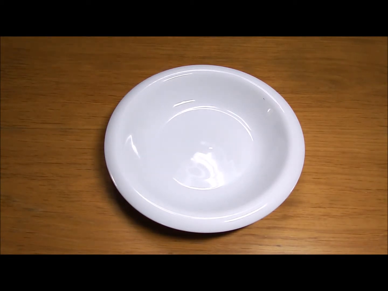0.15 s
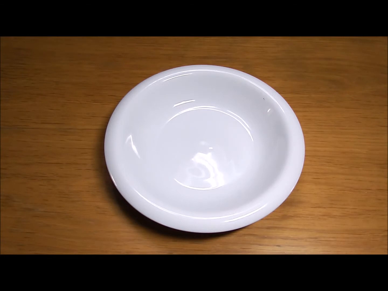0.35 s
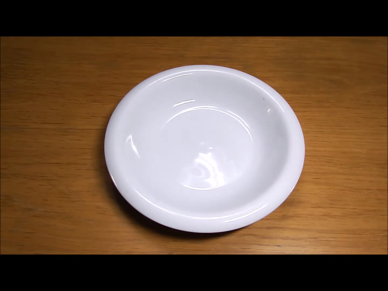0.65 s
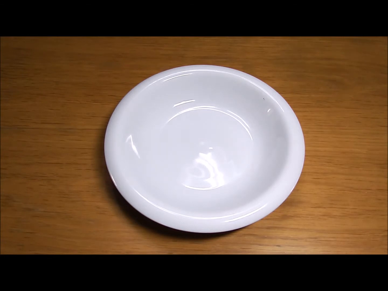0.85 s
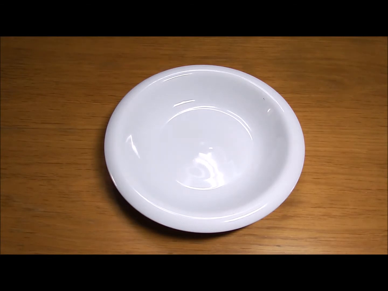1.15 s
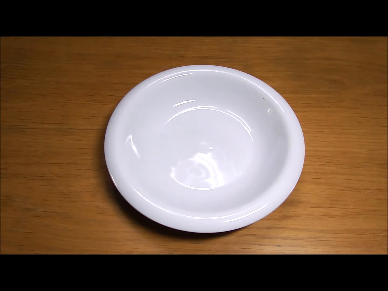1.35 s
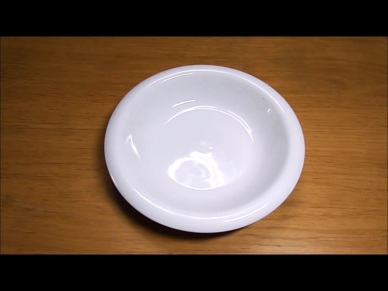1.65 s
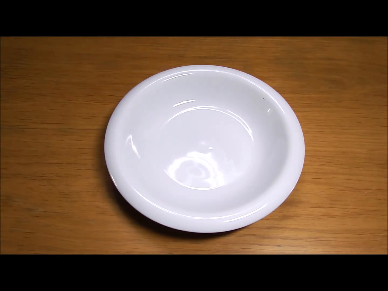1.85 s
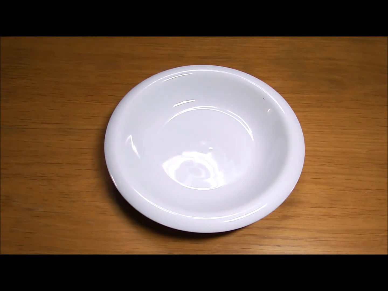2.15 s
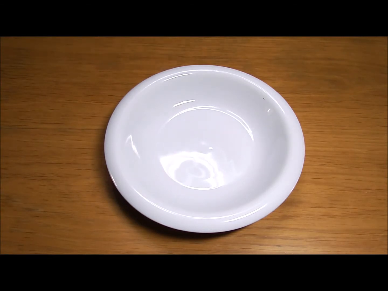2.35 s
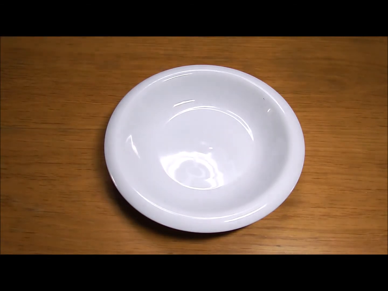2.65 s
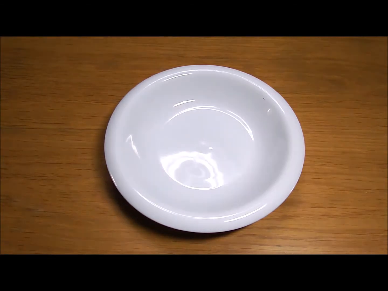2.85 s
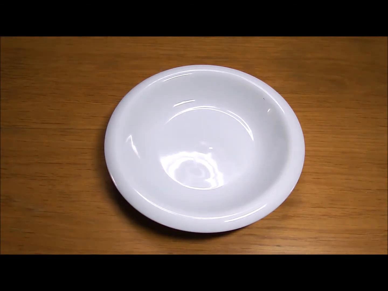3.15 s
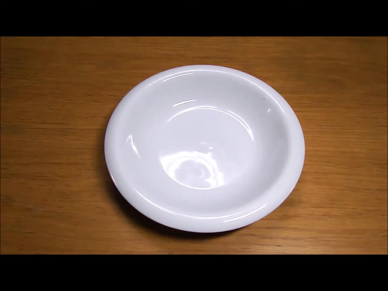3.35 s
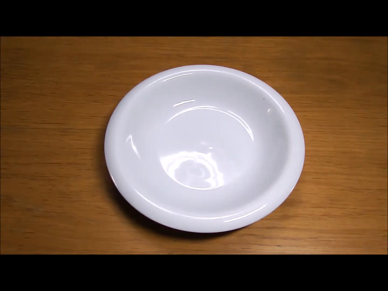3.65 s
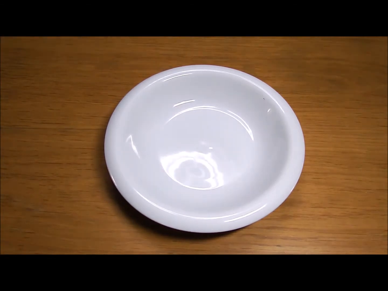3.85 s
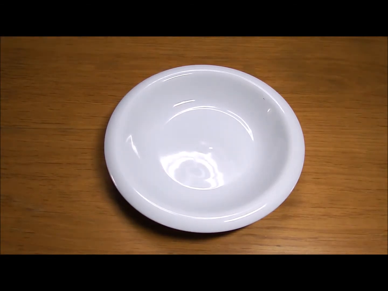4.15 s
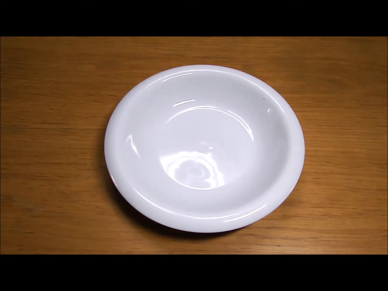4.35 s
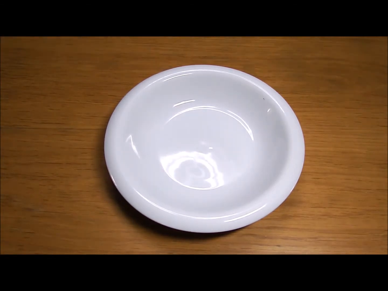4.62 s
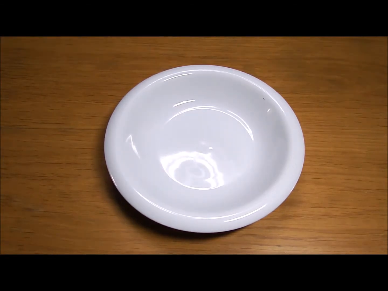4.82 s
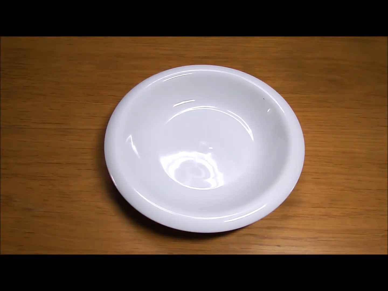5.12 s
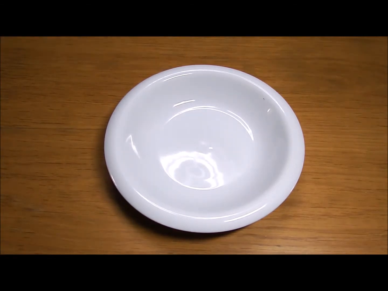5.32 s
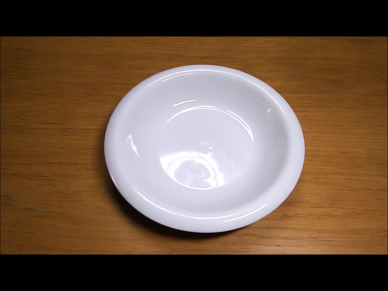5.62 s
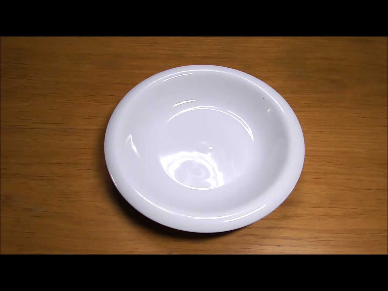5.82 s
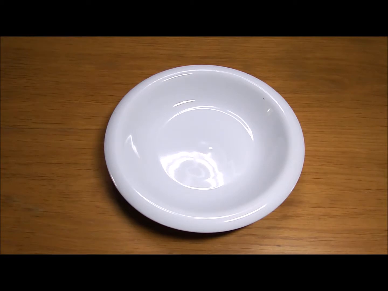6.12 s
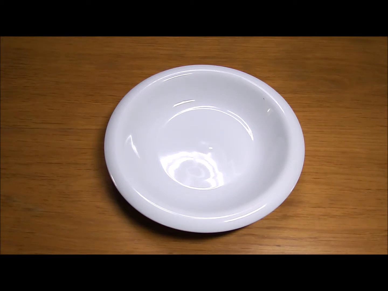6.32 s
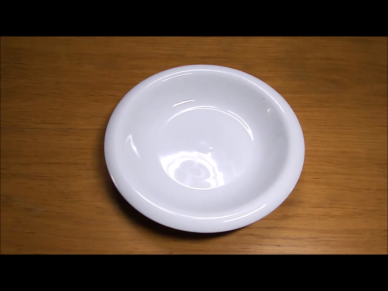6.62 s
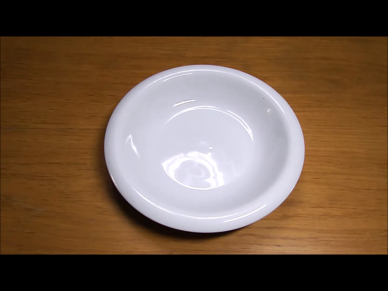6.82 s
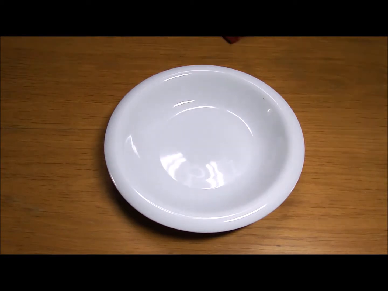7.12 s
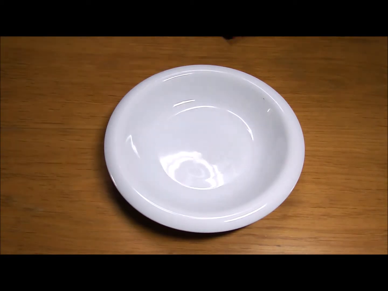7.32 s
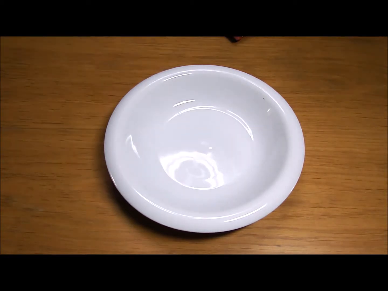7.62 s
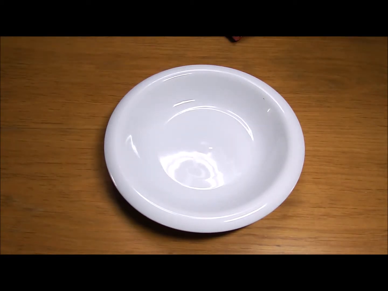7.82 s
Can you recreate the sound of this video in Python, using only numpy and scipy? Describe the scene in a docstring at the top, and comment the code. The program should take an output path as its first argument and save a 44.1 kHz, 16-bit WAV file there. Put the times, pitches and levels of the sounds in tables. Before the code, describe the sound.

Close indoor sound of foil-lined film being pulled and creased at a wooden table. Bright, irregular snaps stand out over a finer papery rustle, easing briefly and returning. Past the middle come a few dull muffled bumps and thin squeaky swishes, then near silence with light hiss. Sharp crackling resumes, peaks once more and dies to tiny ticks. Short room reverberation.

```python
"""First a rustle that fades, pricked by sharp snaps: a foil snack bag is pulled open at a wooden table.
Small room, camera microphone close by. Each crease buckles as a short noise burst ringing at its own pitch;
thousands of small ones make the rustle. Later come soft low bumps, then swishes and thin squeaks of film.
Table and walls return early echoes and a short tail, over faint room hum and microphone hiss."""
import sys
import numpy as np
from scipy import signal
from scipy.fft import rfft, irfft
from scipy.io import wavfile
from scipy.ndimage import uniform_filter1d

SR = 44100
rng = np.random.default_rng(int(sys.argv[2]) if len(sys.argv) > 2 else 0)


def to_wav(sig):
    """Store sig (one row per channel, or 1-D mono) as 16-bit WAV at the path in sys.argv[1].

    Samples outside -1..1 are clipped; the rate is SR.
    """
    pcm = np.clip(np.atleast_2d(sig), -1, 1) * 32767
    pcm = np.round(pcm).astype(np.int16)
    wavfile.write(sys.argv[1], SR, pcm.T)  # frames by channels


N = 351918

# Handling of the bag: start_s, level_db, bass_db (re level), treble_db (re level)
RUSTLE = [(0, -30, -11, -19), (.2, -48, 4, -27), (.7, -47, 3.5, -16), (.98, -37, 0.5, -16),
          (1.35, -50, -1, -22), (1.55, -42, -3, -25), (1.95, -49, -7, -17), (2.45, -50, -1, -13),
          (2.66, -31, -4, -25), (2.9, -33, -6.5, -18), (3.0, -41, -1, -13), (3.2, -38, -7.5, -26),
          (3.381, -29, -17, -22), (3.46, -37, -14, -28), (3.53, -25, -10, -18.5), (3.65, -38, -12, -16),
          (3.7, -20, -12, -20), (3.89, -18, -14, -23), (4.0, -39, -3, -27), (4.05, -30, -9, -13),
          (4.18, -46, -19, -30), (4.42, -34, -12, -23), (4.72, -33, -4, -27), (5.05, -50, 6, -16),
          (5.5, -62, 5, -20), (6.18, -58, -18, -15), (6.26, -34, -2.5, -19), (6.42, -38, -8, -14),
          (6.54, -31, -7, -29), (6.7, -38, -10, -22), (7.0, -46, -3.5, -25), (7.18, -42, -2, -28),
          (7.24, -22, -2, -13.5), (7.31, -38, -8, -36), (7.7, -54, -4, -24), (7.98, -52, -6, -25)]
# Loud creases: start_s, peak_db, pitch_hz, upper_db (upper middle re lower middle),
# bass_db (re peak), treble_db (re peak), length_ms (before the stretch of each band)
SNAPS = [(.0141, -23, 4020, 12.5, -7, -26, 1.8), (.0446, -21.5, 2070, -7.5, -25, -34, 0.68),
         (0.049, -15, 2000, -4, -28, -33, 1.8), (.0991, -6, 3040, 12, -18.5, -17, 1.2),
         (0.1087, -18.5, 3700, 11, -5, -28, 1.4), (.1147, -18, 2220, 7, -7, -19, 0.6),
         (.1321, -7.5, 2060, 2.5, -31, -22, 1.15), (0.1689, -13, 2730, 3, -32, -20, 0.59),
         (0.2324, -20, 3240, -1, -9.5, -12.5, 7.3), (0.3357, -16, 1470, -1, 1, -34, 2.9),
         (.3778, -22, 1830, 0, -13, -34, 4.7), (.39, -20.5, 2060, 1, -13, -35, 1.3),
         (0.4336, -12.5, 2080, 3.5, -27, -30, 0.78), (0.4689, -8, 2200, 7, -41, -26, 2.3),
         (0.4754, -15.5, 4780, 14, -22, -11, 1.1), (0.5313, -8.5, 1880, 4, -11, -13, 2.5),
         (.5408, -16, 4200, 1, -3, -17, 1.6), (0.5874, -19.5, 584, 5, 1, -13, 2.6),
         (0.602, -20, 2150, -1, -16, -20, 1.2), (0.683, -21, 1400, -2.5, -11, -34, 1.8),
         (.695, -13.5, 2200, 3, -16.5, -38, 0.71), (0.7336, -16, 2120, 0.5, -8, -25, 2),
         (0.7494, -5.5, 2020, -5, -12, -25, 1.6), (0.7677, -5.5, 2260, 11, -17.5, -11.5, 1.4),
         (0.7723, -7.5, 3140, 5, -15, -22, 1.8), (0.8041, -10.5, 2130, 0.5, -7.5, -14, 2.3),
         (.825, -17, 1940, 6, -10.5, -21, 1.6), (.8307, -15, 1330, -6, -12.5, -30, 1.9),
         (.866, -9.5, 1250, -9, -21, -34, 1.1), (0.8837, -10.5, 2770, 13, -22, -19, 1.25),
         (0.9103, -21, 1620, -10, -9, -22, 2.1), (0.9429, -14, 1290, -10, -3.5, -27, 2.4),
         (.9635, -20, 1790, 5, -18, -22, 4.2), (0.978, -17, 700, -1, 0, -29, 2.6),
         (1.0055, -19, 3160, 15, -19, -19, 2.1), (1.0233, -11.5, 3900, 5, -29, -13, 1.2),
         (1.0814, -10, 2220, -19, -12.5, -42, 1.2), (1.1087, -4.5, 4000, 8.5, -26, -14, 1.6),
         (1.1135, -12.5, 1940, 2, -6, -33, 0.39), (1.128, -14, 3700, 7, -18, -6, 1.2),
         (1.1904, -10.5, 1360, 0, -4, -22, 2.4), (1.213, -4.5, 2860, 1.5, -23, -29, 0.78),
         (1.2474, -13, 3000, 3, -15, -17, 1.1), (1.2936, -5.5, 1370, 1, -14.5, -14.5, 2.2),
         (1.3193, -15, 1340, -10, -10.5, -30, 2), (1.3272, -4, 3100, 9, -33, -22, 0.31),
         (1.413, -27.5, 3770, 7, -15, -15, 2.1), (1.5272, -23.5, 3130, 0.5, -14, -12, 3.1),
         (1.542, -27.5, 2310, -1, -3, -20, 1), (1.616, -24, 1330, -1, -13, -39, 0.42),
         (1.6334, -11, 4560, 7, -27, -18.5, 1.4), (1.657, -14, 2940, 2.5, -24, -12, 2),
         (1.706, -15.5, 4000, 5, -22, -10, 1), (1.7229, -12.5, 2150, 2, -38, -30, .54),
         (1.7322, -4, 4000, 2.5, -15, -24, 1.45), (1.7555, -19.5, 1440, -6, -10, -10, 0.58),
         (1.7758, -9, 2160, 3, -19, -18, 1.3), (1.7966, -17.5, 1300, -2, -22, -12, 0.68),
         (1.8219, -13, 1520, -2.5, -20, -24, 2.1), (1.8263, -15, 2140, 7, -30, -23, 1.5),
         (1.9661, -14, 1380, -0.5, -21.5, -19.5, 1.26), (2.0167, -29, 2780, -1, -8, -18, 2.6),
         (2.0445, -26, 4020, 2, -8.5, -15, 3.7), (2.1078, -30.5, 3880, 0, -8, -24, 1.5),
         (2.1265, -29.5, 3960, 6, -16, -10, 3.5), (2.1357, -27, 1410, -1, -10, -19, 1.4),
         (2.1521, -29, 1340, -8, -7, -26, 2.5), (2.2061, -33, 1830, -15, 0, -29, 2),
         (2.2316, -24.5, 2140, 2.5, -14, -11, 1.3), (2.2831, -25, 3120, -0.5, -24, -20, 1.7),
         (2.343, -24.5, 1940, -8, -19, -18, 0.75), (2.3759, -28.5, 1960, -3, -13, -20, 3.5),
         (2.416, -11, 830, -3.5, -8.5, -25, 2), (2.509, -10, 2670, 4.5, -33, -16.5, 2.6),
         (2.518, -17.5, 2860, 0, -24, -26, 1.8), (2.5464, -5.5, 3120, 3, -27, -16.5, 1.8),
         (2.607, -13.5, 2280, -6, -22, -37, 1.5), (2.6157, -14, 2150, 3, -12, -24, 2.1),
         (2.632, -9, 1500, -2, -23, -13, 2.5), (2.6526, -13.5, 1900, -1, -8, -28, 0.88),
         (2.69, -20.5, 1940, 1, -10, -26, 0.82), (2.747, -17.5, 2050, 2, -8, -16, 1.6),
         (2.784, -18.5, 1530, -4, -26, -18, 2.4), (2.7955, -12, 1360, -2, -7.5, -32, 2.8),
         (2.8064, -8.5, 1530, 0.5, -12, -24, 1.6), (2.8923, -15, 3170, 1.5, -14, -13.5, 6.8),
         (3.0716, -23.5, 2970, 3, -25, -25, 1.7), (3.141, -28, 3000, -5, -9, -27, 2.1),
         (3.225, -10.5, 3200, 5, -33, -13, 1.1), (3.2733, -19.5, 2150, -2, -11.5, -26, 1.1),
         (3.283, -17.5, 4260, 0.5, -29, -23, 2.2), (3.321, -20, 3080, 17, -23, -26, 1.3),
         (3.3295, -21, 3100, 16, -20, -31, 5.4), (3.3732, -18, 2630, -19, -12.5, -25, 8.7),
         (3.479, -25, 3430, 5, -14, -30, 1.1), (3.4956, -13.5, 2140, -7, -32, -33, 1.3),
         (3.5045, -16, 2220, -3, -23, -32, 3.3), (3.516, -9.5, 2240, 1, -20.5, -26, 2.8),
         (3.6671, -12, 2670, 6, -33, -37, 1.4), (3.7073, -7.5, 1400, -2, -26, -26, 0.43),
         (3.7413, -12.5, 2970, 13, -14, -22, .6), (3.7731, -8.5, 2990, 13, -31, -32, 1.6),
         (3.8114, -9.5, 3600, 21, -31, -26, 1.4), (3.8576, -10.5, 1760, 3, -19, -23, 1.5),
         (4.0291, -17.5, 2680, 10, -13, -22, 4.9), (4.0381, -17, 2520, 14, -17, -25, 4.2),
         (4.194, -19.5, 3100, 30, -34, -25, 1.3), (4.2048, -17, 2880, 10, -41, -38, 1.3),
         (4.2603, -29.5, 2730, 14, -8.5, -30, 1.5), (4.2933, -26.5, 2000, -21, -16, -32, 1.6),
         (4.417, -9.5, 5400, 4, -22, -19, 1.3), (4.4942, -23, 1860, -12, -19, -22, 1.3),
         (4.5646, -24, 1780, 16, -21, -19, 1.8), (4.6146, -15.5, 4800, 2, -27, -26, 0.79),
         (5.9591, -41.5, 1990, 8, -21, -21, 1.8), (6.023, -28, 2100, 4, -15, -19, 1.6),
         (6.093, -25.5, 2950, 7, -22, -27, 1.2), (6.229, -10.5, 3770, 3, -23, -29, 4.3),
         (6.2928, -13, 3350, -3, -16, -32, 3.5), (6.3028, -4, 1760, 8, -25, -21, .44),
         (6.438, -23, 3370, 5, -11, -30, 1.4), (6.495, -21, 1850, -1, -21, -17, 2.3),
         (6.5089, -22.5, 1960, 9, -8, -32, 2.3), (6.5266, -20.5, 1960, 3, -12, -30, 1.4),
         (6.5481, -3.5, 2200, 2, -18.5, -24, 1.8), (6.5544, -10, 2170, 13, -18, -23, 1.2),
         (6.601, -9.5, 1420, 9, -29, -10.5, 0.89), (6.612, -3, 2300, 1, -31, -16, 1.1),
         (6.656, -19, 2170, 5, -19, -12, 2.6), (6.6838, -10, 2110, -6, -29, -29, 1.6),
         (6.6941, -11, 4260, 10, -29, -22, 1.9), (6.7118, -17, 2350, -3, -13, -14, 4.3),
         (6.7221, -6, 4400, 13, -19, -31, 0.88), (6.7265, -6, 3060, 2, -17.5, -13, 1.5),
         (6.797, -16.5, 2300, 3, -16, -16.5, 3), (6.8459, -18, 3870, 0, -21, -21, 2.8),
         (6.958, -23.5, 1900, 0, -9.5, -31, 1.7), (7.0292, -23, 2150, -1, -27, -30, 1.3),
         (7.0399, -18, 3920, 6, -14, -26, 3.7), (7.0447, -11.5, 4400, 3, -15, -9.5, 3.9),
         (7.0659, -12, 1410, -0.5, -7.5, -29, 2.3), (7.103, -16.5, 1720, 4, -25, -40, 1),
         (7.1421, -8.5, 2940, 1, -21.5, -8.5, 1.5), (7.1478, -12.5, 3140, 2, -9, -27, 3.6),
         (7.1587, -12, 2020, -2, -11.5, -23, 2.4), (7.206, -4, 3750, 6.5, -11.5, -15.5, 1.6),
         (7.221, -12.5, 2130, -1.5, 3.5, -23, 3.1), (7.242, -1, 3030, -2, -15, -15, 0.9),
         (7.301, -16.5, 2060, -12.5, -14.5, -39, 2.2), (7.385, -27, 3900, 11, -23, -11, 2.7),
         (7.4465, -25.5, 1590, -1.5, -12, -21, 2.6), (7.5687, -31, 2140, -4.5, -6.5, -17, 2.1),
         (7.7114, -29.5, 1470, -9, -3.5, -34, 1.4), (7.738, -7, 1790, 3, -12, -35, 1.56),
         (7.8656, -31, 3210, 8, -12, -26, 1.1)]
# Colour of the foil: frequency_hz, gain_db (per Hz)
FOIL = [(35, -79.5), (60, -63), (217, -20), (330, -2), (600, 0), (968, -1), (1440, -2.5), (3120, -2),
        (4320, -3.5), (5200, -12), (6430, -28.5), (8920, -21.5), (12000, -35), (16000, -61)]
# Borders between bass, lower middle, upper middle and treble: frequency_hz
BAND_EDGES_HZ = 1100, 2500, 6000
# Stretch of a snap's length in each band, bass to treble: ratio
BAND_STRETCH = 1.45, 1.4, 1.046, 0.8
# Soft bumps, perhaps hand and bag on the table: start_s, length_s, level_db, tilt_db (per octave)
BUMPS = [(3.324, .1, -61.5, -14), (4.55, .15, -53.5, -16), (4.659, 0.12, -41.5, 1.5),
         (5.09, 0.065, -31.5, -3.5), (5.339, .034, -56, 1), (5.399, 0.038, -46.5, 10),
         (7.187, 0.08, -35, -2.5)]
# Low resonances shared by the bumps: frequency_hz, width_hz, level_db (re bump)
BUMP_RINGS = [(148, 53, -21), (328, 100, 0), (493, 246, -0.5), (626, 200, -1.5), (940, 370, -7)]
# Swishes and thin squeaks of the film: start_s, length_s, pitch_hz, width_hz, level_db (before the swell)
SWISHES = [(4.189, 0.046, 2940, 1220, -39), (4.666, .11, 4240, 100, -44), (4.668, 0.099, 6450, 39.6, -61),
           (5.074, 0.084, 1600, 910, -37), (5.098, .11, 3400, 1270, -36), (5.401, .035, 1770, 900, -43.5),
           (5.402, 0.028, 3090, 250, -42), (5.403, 0.031, 4170, 400, -43)]
# Early echoes from table and walls: delay_s, level_db (re direct, before the treble loss)
ECHOES = [(0.0075, -13.5), (0.016, -13.5), (0.0087, -10.5), (0.016, -9.5), (.0166, -22)]
# Treble loss of the echoes: frequency_hz, gain_db
ECHO_COLOUR = [(200, -1), (3000, -4.5), (6000, -12), (16000, -10)]
# Room tail: frequency_hz, t60_s, energy_db (re direct)
TAIL = [(200, 0.3, -5), (700, 0.39, -2.5), (2000, 0.44, -4), (4170, 0.47, -3.5), (9000, 0.31, -6.5),
        (15600, 0.5, -20)]
# Stereo width of the room sound: frequency_hz, gain_db (on the side signal)
SIDE_COLOUR = [(60, -23), (250, -34), (1000, -29.5), (1600, -20.5), (4200, -23), (5300, -17.5), (6700, 8),
               (8000, -4.5), (8800, -18), (10300, -1), (12400, -18), (16000, -15)]
# Hum and hiss of the background: frequency_hz, gain_db (per Hz, before the overall level is set)
AIR = [(35, -80), (60, -63), (170, -12), (217, -21.5), (256, -4), (363, -7), (600, 0.5), (900, -6),
       (1280, -8), (3200, -12.5), (4300, -12), (5000, -29), (6200, -26.5), (16000, -33.5)]
# Further colour of the background's side signal: frequency_hz, gain_db
AIR_SIDE = [(100, -14.5), (3000, -9), (7000, -0.5), (16000, -1)]
# Narrow dips of the microphone path: frequency_hz, width_hz
NOTCHES = [(1103, 209), (220, 20)]

SNAP_RING_DB, SNAP_RING_OCTAVES = 5, .2
AFTER_DB, AFTER_S = -34, .015  # rustle after a snap: level re its peak, time constant of its power
RUSTLE_UPPER_DB = 0  # upper middle re lower middle
BUMP_PIVOT_HZ = 335  # the tilt leaves this frequency alone
AIR_DB = -55.5
LEFT_DB = -0.4  # left re right
TOP_HZ = 16000


def undb(db):
    """Turns decibels into an amplitude factor."""
    return 10 ** (np.asarray(db) / 20)


def level(x, db):
    """Scales each track to this RMS level."""
    return x * undb(db) / np.sqrt(np.mean(x ** 2, axis=-1, keepdims=True))


def along(table, hz):
    """Reads (Hz, value) points on a log-frequency axis."""
    f, v = np.transpose(table)
    return np.interp(np.log(hz + 1), np.log(f), v)


def colour(x, table):
    """Weights the spectrum by (Hz, dB) points."""
    size = x.shape[-1]
    gain = undb(along(table, np.fft.rfftfreq(size, 1 / SR)))
    return irfft(rfft(x) * gain, size)


def causal(db):
    """Minimum-phase spectrum with these dB gains, so that no ringing precedes the onset."""
    cepstrum = irfft(db * np.log(10) / 20)
    half = cepstrum.shape[-1] // 2
    cepstrum[..., 1:half] *= 2
    cepstrum[..., half + 1:] = 0
    return np.exp(rfft(cepstrum))


def spread(db, upper_db, bass_db, treble_db):
    """Levels of the four bands; the stronger middle band carries the given level."""
    lower_middle = db - np.maximum(upper_db, 0)
    upper_middle = db + np.minimum(upper_db, 0)
    return db + bass_db, lower_middle, upper_middle, db + treble_db


def snaps(s, db, pitch_hz, length_s, ring_db, ring_octaves, size=512):
    """Four tracks, bass to treble, of buckling creases: a sharp dying burst that rings around its pitch."""
    hz = np.fft.rfftfreq(size, 1 / SR) + 1
    t = np.arange(size) / SR
    noise = rng.standard_normal((len(s), size)) * np.minimum(t / 0.00017, 1)
    octaves_off = np.log2(hz / pitch_hz[:, None])
    ring = ring_db * np.exp(-.5 * (octaves_off / ring_octaves) ** 2)
    # power share of each band at each frequency
    above = [1 / (1 + (edge / hz) ** 10) for edge in BAND_EDGES_HZ]
    shares = -np.diff([1 + 0 * hz, *above, 0 * hz], axis=0)
    at = (np.round(s * SR).astype(int)[:, None] + np.arange(size)).ravel()
    tracks = []
    for share, peak_db, stretch in zip(shares, db, BAND_STRETCH):
        decay = undb(-9 * (t / (stretch * length_s[:, None])) ** 1.205)
        burst = rfft(noise * decay)
        burst /= uniform_filter1d(np.abs(burst), size=9, axis=1)  # a snap is broad and even in colour
        gain_db = along(FOIL, hz) + ring + 10 * np.log10(np.maximum(share, 1e-7))
        band = irfft(burst * causal(gain_db))
        peak = np.abs(signal.hilbert(band)).max(axis=1)
        band *= (undb(peak_db) / peak)[:, None]
        tracks.append(np.bincount(at, band.ravel(), N + size)[:N])
    return np.array(tracks)


def rustle(count=4500):
    """A rain of small creases, few larger among many tiny; busy hands and fresh snaps make it louder and denser."""
    when, big, pitch, *tilt = rng.random((count, 7)).T
    now = np.arange(N) / SR
    start_s, *columns = np.transpose(RUSTLE)
    hands_db, bass_db, treble_db = (np.interp(now, start_s, c) for c in columns)
    # each snap adds power that dies away
    snap_s, peak_db = np.transpose(SNAPS)[:2]
    kicks = np.bincount((snap_s * SR).astype(int), undb(peak_db + AFTER_DB) ** 2, N)
    after = signal.lfilter([1], [1, -np.exp(-1 / (AFTER_S * SR))], kicks)
    busy_db = 10 * np.log10(undb(hands_db) ** 2 + after)
    # creases fall more often where the handling is busy
    density = undb(.6 * busy_db)
    when = np.interp(when, np.cumsum(density) / density.sum(), now)
    db = -4. * np.log(big + 0.032) + 8 * np.array(tilt)
    pitch_hz = 1300 * 4.1 ** pitch
    tracks = snaps(when, db, pitch_hz, np.full(count, .0015), 2.6, 0.5)
    even = level(tracks / np.sqrt(density), -7.0)  # density no longer sets the loudness
    return (even * undb(spread(busy_db, RUSTLE_UPPER_DB, bass_db, treble_db))).sum(axis=0)


def air():
    """Room hum and microphone hiss as coloured noise, drawn separately for mid and side."""
    mid, side = level(colour(rng.standard_normal((2, N)), AIR), AIR_DB)
    return mid, colour(side, AIR_SIDE)


def loud_creases():
    """The snaps that stand out: creases that buckle hard for a few milliseconds at most in the main."""
    start_s, peak_db, pitch_hz, upper_db, bass_db, treble_db, length_ms = np.transpose(SNAPS)
    bands_db = spread(peak_db, upper_db, bass_db, treble_db)
    length_s = np.maximum(length_ms, .25) / 1000
    return snaps(start_s, bands_db, pitch_hz, length_s, SNAP_RING_DB, SNAP_RING_OCTAVES).sum(axis=0)


def tail(size=24576):
    """Diffuse reverberation: noise that builds up after the first walls and decays at a rate set by pitch."""
    hz, t60_s, db = np.transpose(TAIL)
    f, t, z = signal.stft(rng.standard_normal(size), SR, nperseg=256)
    fade = undb(-60 * t / along(np.c_[hz, t60_s], f)[:, None])
    decay = signal.istft(z * fade, SR, nperseg=256)[1][:size]
    decay = decay * np.clip((np.arange(size) / SR - .002) / 0.0036, 0, 1)
    return colour(decay / np.sqrt(np.sum(decay ** 2)), np.c_[hz, db])


def room(dry, count=7, moves_s=.045, size=8192):
    """Mid and side: direct sound, early echoes and tail. The bag moves, so the tail cycles through several paths."""
    dry = np.r_[dry[size:0:-1], dry]  # the bag was already rustling, so the room is full from the start
    place = (np.arange(len(dry)) / SR / moves_s).astype(int) % count
    early = np.zeros(2048)
    for delay_s, db in ECHOES:
        early[int(delay_s * SR)] += undb(db)
    early = colour(early, ECHO_COLOUR)
    early[0] += 1  # direct sound
    apart = 0.18 * rng.standard_normal(40)  # the capsules sit a little apart
    mid, side = (signal.fftconvolve(dry, path)[size:size + N] for path in (early, apart))
    for k in range(count):
        here = dry * (place == k)
        mid += signal.fftconvolve(here, tail())[size:size + N]
        side += signal.fftconvolve(here, undb(2.5) * tail())[size:size + N]
    return mid, colour(side, SIDE_COLOUR)


def swell(out, s, length_s, hz, width_hz, db):
    """Noise in one resonance that swells and fades, laid over a track."""
    size = int(length_s * SR)
    edges = hz - width_hz / 2, hz + width_hz / 2
    band = signal.butter(3, edges, "band", fs=SR, output="sos")
    rub = signal.sosfilt(band, rng.standard_normal(16384))[-size:]  # the end, where the filter has settled
    start = int(s * SR)
    return out + np.pad(level(rub, db) * np.hanning(size), (start, N - start - size))


def bumps():
    """Soft contacts in the same few low resonances, duller or brighter each time."""
    out = np.zeros(N)
    for start_s, length_s, db, tilt_db in BUMPS:
        for hz, width_hz, ring_db in BUMP_RINGS:
            ring_level_db = db + ring_db + tilt_db * np.log2(hz / BUMP_PIVOT_HZ)
            out = swell(out, start_s, length_s, hz, width_hz, ring_level_db)
    return out


def swishes():
    """Smooth friction of film on film: band noise, narrow enough in places to squeak."""
    out = np.zeros(N)
    for row in SWISHES:
        out = swell(out, *row)
    return out


def scene():
    """The bag in the room over the background, as left and right."""
    bag = rustle() + loud_creases() + bumps() + swishes()
    mid, side = np.add(room(bag), air())
    return np.array([mid + side, mid - side])


def record(dry):
    """The microphone path leans a little right, has two narrow dips, cuts both ends and rounds loud peaks."""
    out = dry * undb([[LEFT_DB / 2], [-LEFT_DB / 2]])
    for hz, width_hz in NOTCHES:
        out = signal.lfilter(*signal.iirnotch(hz, hz / width_hz, SR), out)
    out = signal.sosfilt(signal.butter(3, 150, "high", fs=SR, output="sos"), out)
    out = 1.1 * np.tanh(out / 1.1)
    return signal.sosfilt(signal.ellip(8, .2, 70, TOP_HZ, fs=SR, output="sos"), out)


dry = scene()
out = record(dry)
to_wav(out)
```